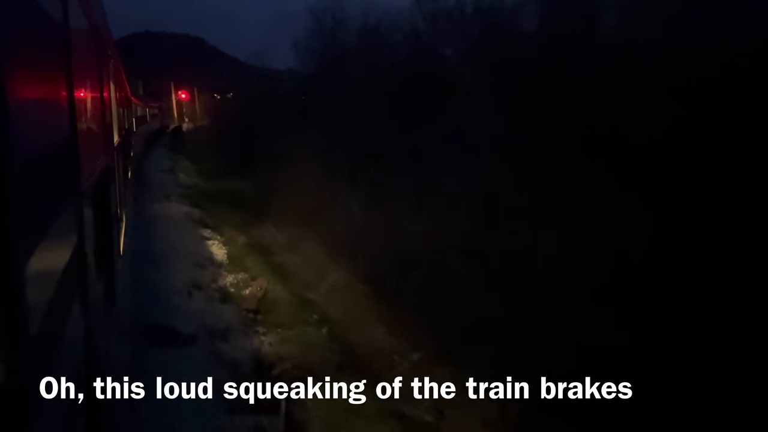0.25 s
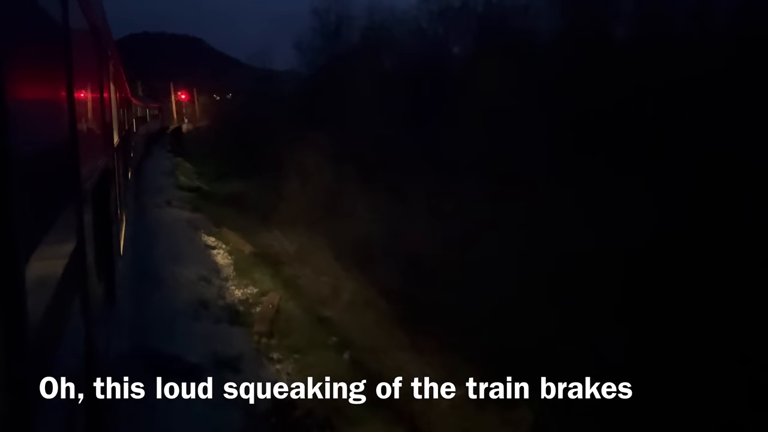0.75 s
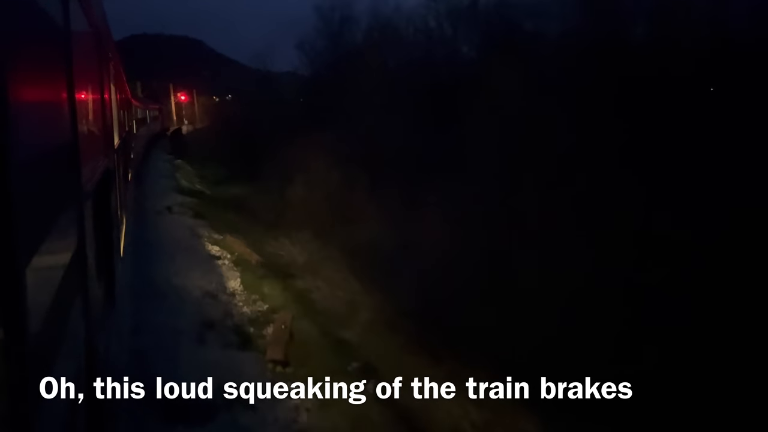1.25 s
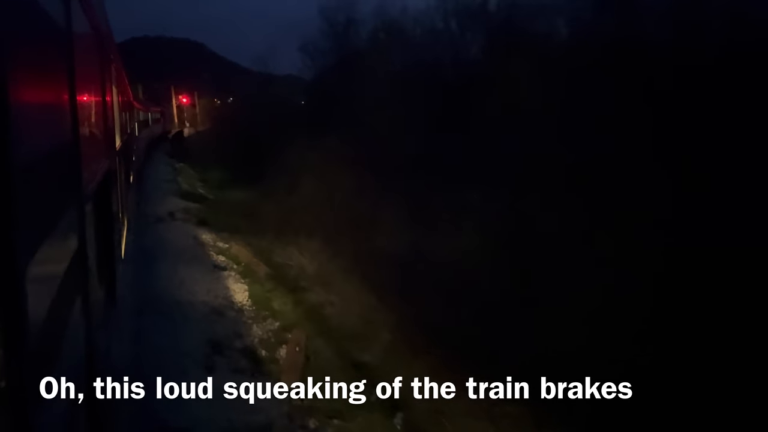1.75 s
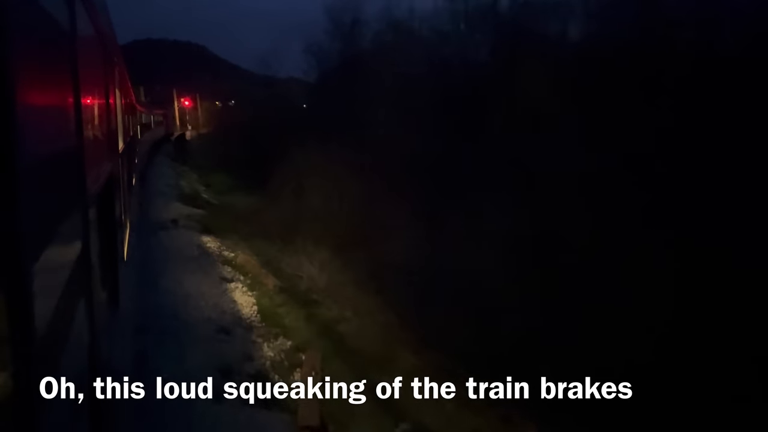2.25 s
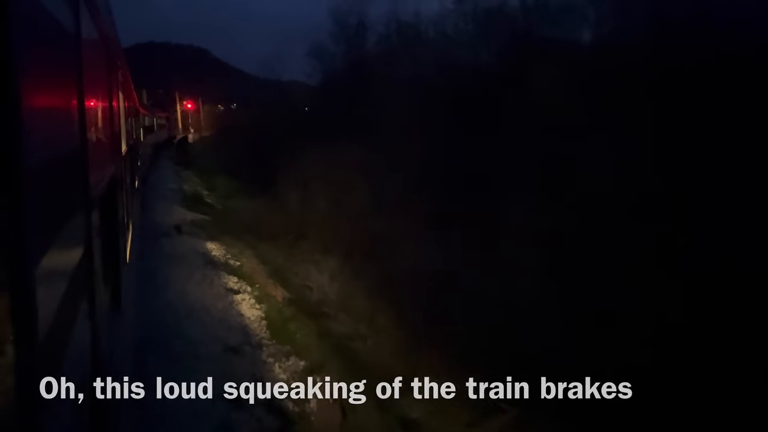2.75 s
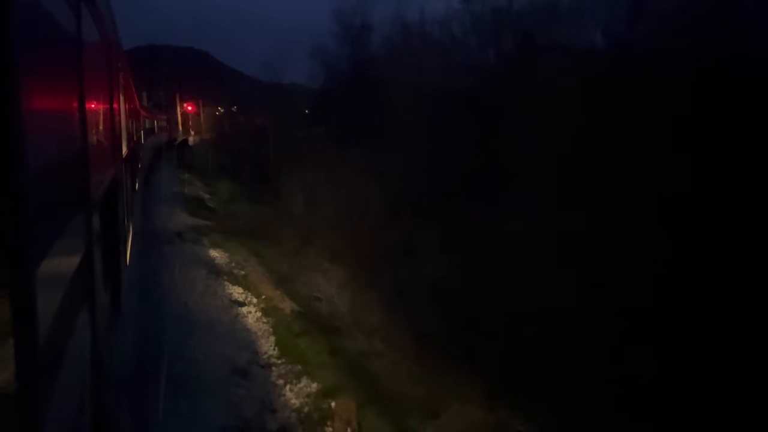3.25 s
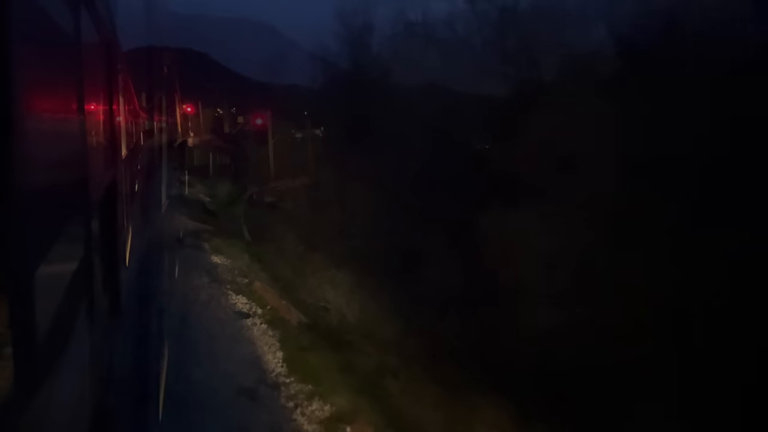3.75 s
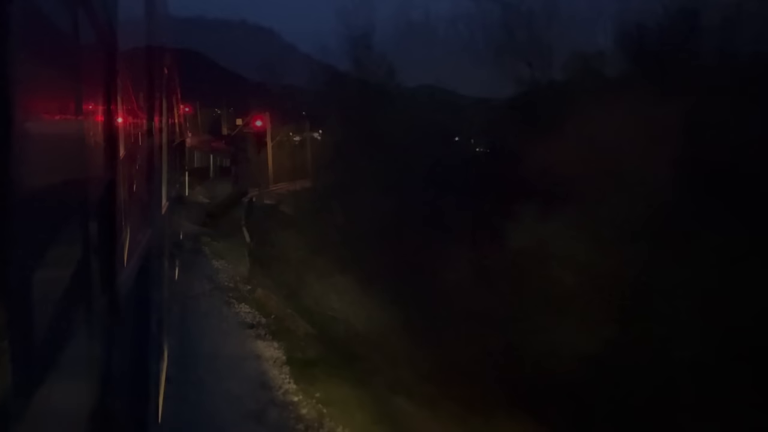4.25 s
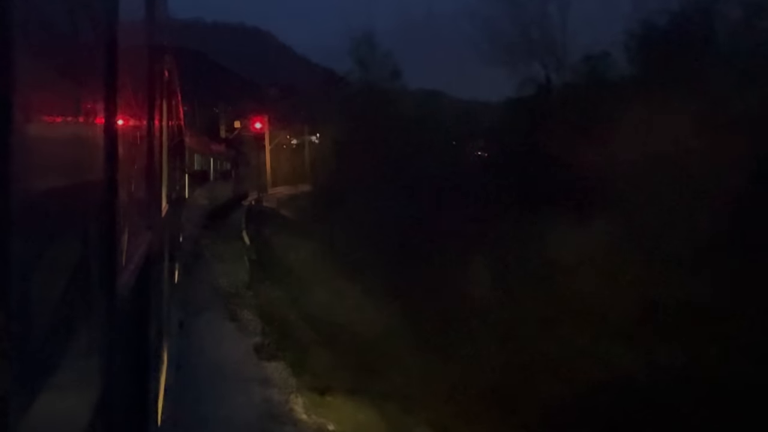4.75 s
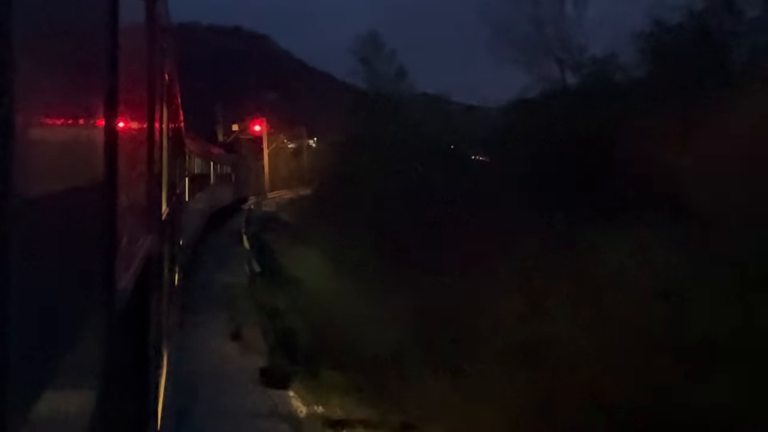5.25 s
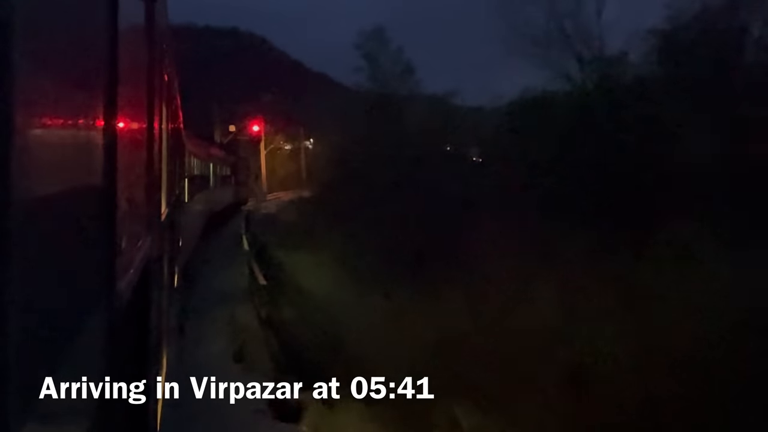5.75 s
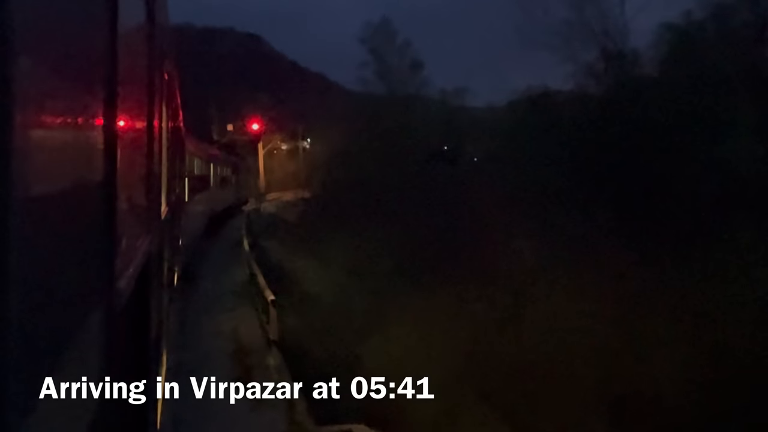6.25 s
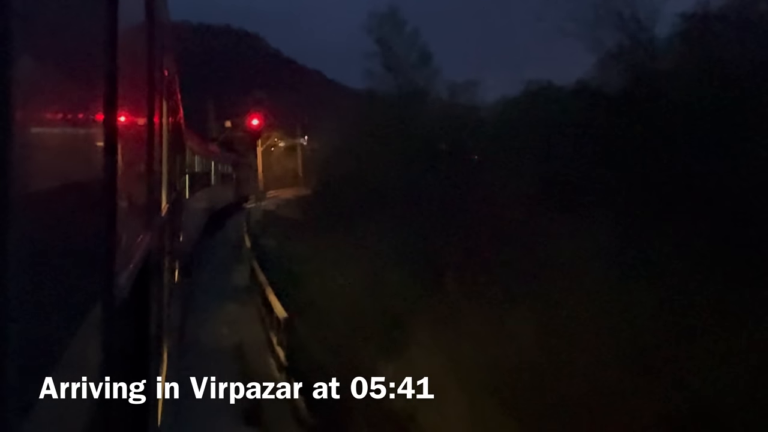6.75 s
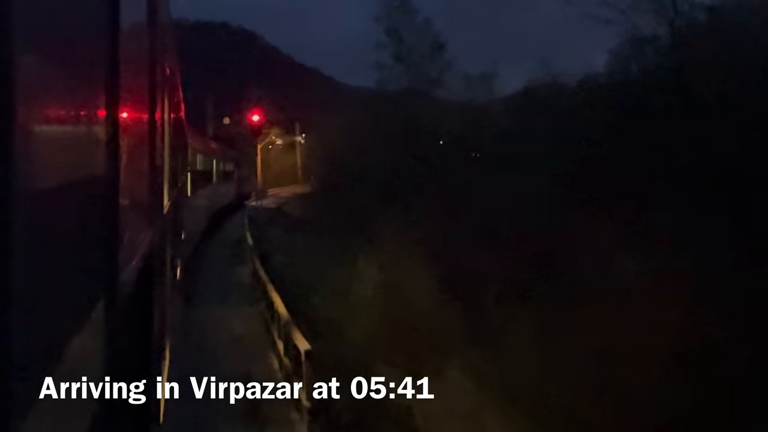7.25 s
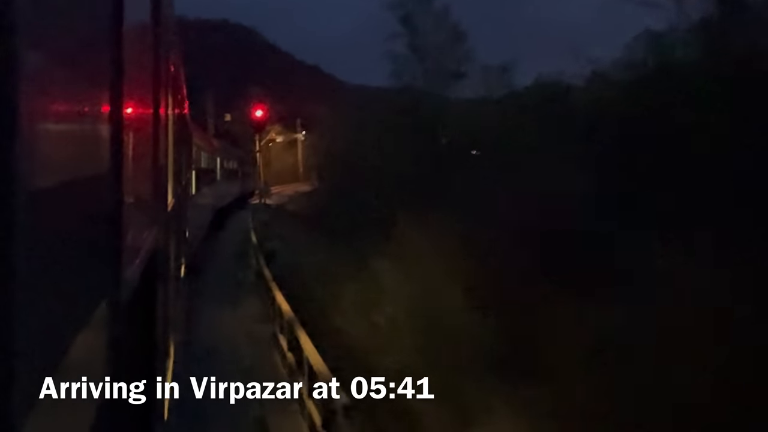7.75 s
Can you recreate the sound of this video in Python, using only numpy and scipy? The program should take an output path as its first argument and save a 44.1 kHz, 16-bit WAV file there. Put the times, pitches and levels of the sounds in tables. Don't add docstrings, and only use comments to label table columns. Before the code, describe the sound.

Very high brake screeching dominates at first, its close pitches shimmering unevenly, with distant coach rumble and soft thumps beneath. Midway it thins out and disappears. Then wind shoves bluntly at the exposed microphone outside the train window, over a growing nearby rail roar, repeated bright flange scrapes and a few metallic knocks. No voices.

```python
import sys
import numpy as np
from scipy import signal
from scipy.io import wavfile
from scipy.ndimage import uniform_filter1d

SR = 44100
rng = np.random.default_rng(int(sys.argv[2]) if len(sys.argv) > 2 else 0)


def unload_audio(sound):
    columns = np.transpose(np.atleast_2d(sound))
    steps = np.round(np.clip(columns, -1, 1) * 32767)
    wavfile.write(sys.argv[1], SR, steps.astype(np.int16))


def amplitude_ratio(level_db):
    exponent = np.asarray(level_db, float) / 20
    return 10 ** exponent


N = 352359


def evened(x):
    return x / np.sqrt(np.mean(abs(x) ** 2) + 1e-20)


def columns(rows, at):
    first, *rest = np.transpose(rows)
    return [np.interp(at, first, column) for column in rest]


def drift(shape, *spans):
    x = rng.standard_normal(shape)
    for axis, span in enumerate(spans):
        x = uniform_filter1d(x, span, axis)
        x = uniform_filter1d(x, span, axis)
    return evened(x)


def joined(*levels_db):
    return 10 * np.log10(sum(amplitude_ratio(2 * np.maximum(db, -200)) for db in levels_db))


def swell(t, start, hold, db, rise_db_per_s, fall_db_per_s):
    early, late = np.maximum(start - t, 0), np.maximum(t - start - hold, 0)
    return db - rise_db_per_s * early - fall_db_per_s * late


def noise(colour, rings, ports, levels, bands, patchy_db, flicker_db, alike=1, size=1024):
    hop = size // 4
    t, hz = np.arange(N // hop + 2) * hop / SR, np.fft.rfftfreq(size, 1 / SR)

    colour_hz, colour_db = np.transpose(colour)
    db = np.interp(np.log(hz + 1), np.log(colour_hz + 1), colour_db)
    db = db + sum(top_db * np.exp(-(2 * (hz - at) / width) ** 4) for at, width, top_db in rings)

    low_db, high_db = columns(levels, t)
    power = amplitude_ratio(2 * db) / 6
    own_db = [10 * np.log10(power[(hz > lo) & (hz < hi)].sum()) for lo, hi in bands]
    low_top, high_bottom = bands[0][1], bands[1][0]
    blend = np.clip((hz - low_top) / (high_bottom - low_top + 60) + .2, 0, 1)
    db = db + np.outer(low_db - own_db[0], 1 - blend) + np.outer(high_db - own_db[1], blend)
    db += patchy_db * drift(db.shape, 6, 10)
    db += flicker_db * drift((len(t), 1), 3)

    same, lead, side_db = columns(ports, hz)
    same = np.clip(np.outer(alike * np.ones(len(t)), same), 0, 1)
    right = amplitude_ratio(-side_db)
    a, b, c, d = np.moveaxis(rng.standard_normal(db.shape + (4,)), 2, 0)
    shared, own = a + 1j * b, c + 1j * d
    z = np.array([shared, right * (same * shared * np.exp(-1j * lead) + np.sqrt(1 - same ** 2) * own)])
    z *= amplitude_ratio(db) / np.sqrt(1 + right ** 2 + 2 * right * same * np.cos(lead))
    return signal.istft(z.transpose(0, 2, 1), nperseg=size, noverlap=size - hop)[1][:, :N]


# frequency in Hz, level in dB per Hz.
FAR_COLOUR = [(130, -19), (260, -21), (390, -9), (620, -0.5), (920, -6.5), (1150, -9), (1850, -7.5),
              (2200, -16), (3350, -15.5), (5050, -17), (6250, -16.5), (7300, -16.5), (8100, -21),
              (10500, -26), (11500, -45)]
# frequency in Hz, width in Hz, boost in dB.
FAR_RINGS = [(461, 69, 9.5), (530, 37, 5), (832, 27, 8.5), (1059, 28, 4)]
# frequency in Hz, likeness 0-1, left lead in rad, left-right in dB.
FAR_PORTS = [(150, .5, 0, 0), (400, .85, .3, -5), (900, .7, 0, -3), (1800, .6, -.3, 2),
             (2300, .35, -2.9, -3), (3000, .3, -5, -2), (4000, .4, -7.6, -3), (6200, .15, -6.8, -6),
             (7200, .3, -7.2, -2)]
FAR_BODY_DB, FAR_HISS_DB, FAR_SAG_DB_PER_S = -54, -63.5, 1.8
FAR_FADE_S, FAR_FADE_DB_PER_S = 3.5, 10


def far_rolling():
    levels = [(s, FAR_BODY_DB, FAR_HISS_DB - FAR_SAG_DB_PER_S * s) for s in (0, N / SR)]
    bed = noise(FAR_COLOUR, FAR_RINGS, FAR_PORTS, levels, [(400, 1480), (2050, 4000)],
                patchy_db=1.26, flicker_db=.45, size=2048)
    return bed * amplitude_ratio(-FAR_FADE_DB_PER_S * np.maximum(np.arange(N) / SR - FAR_FADE_S, 0))


# time in seconds, flutter level in dB.
GUST = [(0.0, -53.5), (3.14, -59), (3.96, -37.5), (4.05, -40), (4.52, -26), (4.83, -32.5), (5.34, -21.5),
        (5.36, -29), (5.58, -17), (5.63, -24.5), (5.67, -15), (5.7, -22), (6.03, -24), (6.05, -17),
        (6.54, -21.5), (6.59, -16.5), (7.97, -23), (7.99, -24)]
# centre in seconds, level in dB, length in seconds.
SHOVES = [(.95, -49, .25), (1.12, -49.5, 0.11), (1.52, -52, .15), (2.07, -50, 0.16), (2.55, -51, .12),
          (2.78, -53, .12), (3.24, -47.5, 0.21), (4.04, -33, 0.11), (4.4, -34, 0.088), (4.872, -33.5, 0.23),
          (5.3, -25, .12), (5.5, -18, 0.14), (6.15, -21, 0.26), (6.597, -16.5, 0.16), (6.78, -16.5, 0.13),
          (7.1, -15, 0.11), (7.328, -14, 0.13), (7.75, -23.5, 0.31)]
THUMP_DB = -3


def wind_levels():
    t = np.arange(0, N / SR, .01)
    flutter_db, = columns(GUST, t)
    shoves = [db - 12 * (2 * (t - s) / length) ** 2 / 2 for s, db, length in SHOVES]
    return np.transpose([t, joined(flutter_db + THUMP_DB, *shoves), flutter_db])


# frequency in Hz, level in dB per Hz.
WIND_COLOUR = [(10, -41), (22, -21), (34, -12.5), (46, 2.5), (71, 4), (101, -3.5), (202, -5.5),
               (303, -10.5), (404, -15), (505, -21.5), (655, -35.5), (950, -54), (2000, -94)]
# frequency in Hz, likeness 0-1, left lead in rad, left-right in dB.
WIND_PORTS = [(60, .94, 0, -.5), (130, .82, 0, -1.1), (290, .48, .3, -1.3), (600, .3, 1, -3)]
CALM_LIKENESS = 0.37


def wind():
    alike = np.interp(np.arange(N // 256 + 2) * 256 / SR, [3.3, 4.2], [CALM_LIKENESS, 1])
    air = noise(WIND_COLOUR, [], WIND_PORTS, wind_levels(), [(50, 87), (110, 340)],
                patchy_db=2.0, flicker_db=0.73, alike=alike)
    air = air * amplitude_ratio(3.23 * drift(N, 200) - 1.2)
    low_cut = signal.butter(3, 42, "high", fs=SR, output="sos")
    return signal.sosfilt(low_cut, air)


# start in seconds, level in dB, centre in Hz, width in Hz, 60 dB decay in seconds.
KNOCKS = [(.47, -57, 4400, 500, .2), (.85, -57, 4500, 600, .15), (1.1, -46, 110, 130, .12),
          (1.39, -54, 5400, 5200, 0.33), (1.42, -50.5, 2232, 60, 0.22), (1.54, -55, 4040, 60, 0.23),
          (1.86, -42, 90, 100, 0.13), (2.07, -45, 80, 80, .12), (2.53, -43, 90, 100, .12),
          (3.19, -42, 70, 70, .2), (4.02, -39, 7500, 9000, .11), (5.4, -35, 1992, 50, .2),
          (6.3, -32, 3100, 5200, .14)]


def knocks():
    out, t = np.zeros((2, N)), np.arange(SR // 3) / SR
    for s, db, hz, width, t60 in KNOCKS:
        edges = np.clip([hz - width / 2, hz + width / 2], 30, SR / 2 - 100)
        resonance = signal.butter(2, edges, "band", fs=SR, output="sos")
        burst = signal.sosfilt(resonance, rng.standard_normal((2, len(t))))
        burst = evened(burst + 1.2 * burst[0])
        burst *= amplitude_ratio(db - 60 * t / t60) * np.minimum(t / .002, 1)
        start = round(s * SR)
        out[:, start:start + len(t)] += burst
    return out


# time in seconds, body level in dB.
NEAR = [(3.3, -54), (3.49, -49), (4.4, -38.5), (5.22, -34), (7.34, -29.5), (7.35, -24.5), (7.36, -31),
        (7.98, -31.5), (7.99, -29)]
# time in seconds, level in dB.
SCRAPES = [(4.0209, -36), (4.43, -35.5), (4.7004, -33.5), (4.9244, -31), (5.0436, -27), (5.4222, -29.5),
           (5.6293, -27.5), (5.7889, -26.5), (5.9226, -29), (6.1132, -23.5), (6.3072, -21.5),
           (6.5192, -20.5), (6.7233, -25.5), (6.841, -20), (7.1408, -30), (7.2581, -23), (7.4142, -26),
           (7.6262, -21), (7.7574, -25), (7.9455, -23)]
SCRAPE_DB, SCRAPE_RISE_DB_PER_S, SCRAPE_FALL_DB_PER_S = -10.5, 300, 38
HISS_DB, HISS_SLOPE, FULL_DB = -38.5, 1.12, -30.5


def near_levels():
    t = np.arange(0, N / SR, .005)
    body_db, = columns(NEAR, t)
    hiss_db = HISS_DB + HISS_SLOPE * (body_db - FULL_DB)
    scrapes = [swell(t, s, 0, db + SCRAPE_DB, SCRAPE_RISE_DB_PER_S, SCRAPE_FALL_DB_PER_S)
               for s, db in SCRAPES]
    return np.transpose([t, body_db, joined(hiss_db, *scrapes)])


# frequency in Hz, level in dB per Hz.
NEAR_COLOUR = [(300, -18.5), (510, -4.5), (720, -7.5), (1120, -12.5), (1920, -13.5), (2520, -12),
               (3320, -21.5), (4020, -17), (6220, -14.5), (7220, -23), (8120, -26.5), (9820, -16.5),
               (11520, -22), (12520, -26.5), (14420, -30), (15250, -42.5), (15700, -70)]
# frequency in Hz, width in Hz, boost in dB
NEAR_RINGS = [(827, 63, 5.5), (1620, 94, 3.5), (2240, 89, 8), (2820, 74, 4.5), (4140, 200, 2.5),
              (4902, 280, 3), (5730, 260, 1.5), (12040, 250, 3), (13330, 820, -40)]
# frequency in Hz, likeness 0-1, left lead in rad, left-right in dB.
NEAR_PORTS = [(400, .4, .9, -2), (900, .3, .8, -6), (1100, .3, -.8, -5), (1500, .65, -.3, 0),
              (1900, .999, 0, 0), (3900, .999, 0, 0), (4400, .87, -.3, 0), (5700, .85, -1, 0),
              (6500, .88, -.2, 0), (7300, .65, -1, 0), (7700, .8, -2.7, 0), (8800, .87, -2.6, 0),
              (10400, .9, 0, 0), (11700, .9, 0, 0), (12700, .9, 2.8, 0), (14000, .3, 4.5, 0),
              (14600, .85, 6.2, 0)]


def near_rolling():
    roar = noise(NEAR_COLOUR, NEAR_RINGS, NEAR_PORTS, near_levels(), [(430, 1920), (3600, 9400)],
                 patchy_db=1.22, flicker_db=0.86)
    return roar * np.clip((np.arange(N) / SR - 3.25) / .4, 0, 1)


# time in seconds, level in dB.
GRIP = [(0.0, -35), (0.01, -32.5), (0.84, -37), (1.27, -31.5), (1.96, -30.5), (2.01, -36), (2.08, -24.5),
        (2.11, -38), (2.17, -30), (2.22, -36.5), (2.66, -30.5), (3.25, -34), (3.46, -29.5), (5.19, -41),
        (5.21, -48), (5.5, -51)]
# start in seconds, hold in seconds, level in dB.
BITES = [
    [(0, 0.23, -42.5), (.5, 0.11, -42.5), (.75, .1, -47), (1.3, 0.23, -49.5), (1.85, 0.26, -48.5),
     (2.3, 0.13, -46.5), (3.6, .1, -55), (3.85, .4, -55.5), (4.5, .05, -62)],
    [(.45, 0.045, -62), (.7, 0.42, -66), (1.4, .05, -54.5), (1.58, .05, -58), (2.0, .05, -62),
     (2.2, 0.29, -67)],
    [(.12, 0.083, -50), (.45, 0.11, -59.5), (.75, .05, -67), (1.42, .03, -70), (2.2, .1, -74)],
]
BITE_DB_PER_S, LET_GO_DB_PER_S = 66, 39


def grips(t):
    bitten = [joined(*(swell(t, *bite, BITE_DB_PER_S, LET_GO_DB_PER_S) for bite in bites))
              for bites in BITES]
    return columns(GRIP, t) + bitten


# time in seconds, spread factor.
SLOWING = [(0, 1.3), (1.5, 1.0505), (3, .9), (4.5, 0.552), (5.2, .4)]
# family, frequency in Hz, spread in Hz, level in dB, gone after seconds.
WHEEL = [(0, 9686, 45.99, 2.5, 5.45), (1, 8620, 43.9, 4.5, 4.8), (2, 4360, 34, 3.5, 2.58),
         (3, 6636, 36.2, 3.5, 2.2), (0, 10232, 45.3, -28.5, 3.2), (0, 9170, 44.8, -36, 4.1),
         (1, 10800, 54.6, -17, 3), (1, 7570, 40, -23.5, 2.6), (1, 13800, 60, -14.5, 1.2),
         (0, 14800, 150, -32.5, 1.86), (1, 5372, 70, -26, 1.2)]
# left lead in rad, angle between wheels in rad, left-right in dB.
WHEEL_PORTS = [(-1.5, .17, -.5), (-2.8, .45, -.5), (-.6, 1.2, -4), (-.5, 1, -4), (-.3, .55, 0),
               (-2.3, .55, 0), (0, .25, 0), (-2.8, 1, -2), (-2.3, .3, 0), (-.3, .55, 0), (-.6, 1.2, -4)]


def squeal(count=5, step=32):
    t, slow = np.arange(N) / SR, np.arange(N // step + 2) * step / SR
    grip_db, (spread,), out = grips(slow), columns(SLOWING, slow), np.zeros((2, N))
    for (family, hz, spread_hz, db, gone), (lead, angle, side_db) in zip(WHEEL, WHEEL_PORTS):
        wander = drift((len(slow), count), 22) + .8 * drift((len(slow), count), 7)
        detune_hz = spread_hz * spread[:, None] * .5 * wander
        turns = np.cumsum(detune_hz, 0) * step / SR + rng.random(count)
        wheels = np.exp(2j * np.pi * turns)
        wheels *= amplitude_ratio(3.35 * drift(wheels.shape, 14))

        leads = lead + angle * evened(rng.standard_normal(count))
        ports = np.exp(.5j * np.outer(leads, [1, -1]))
        both = wheels @ ports * amplitude_ratio(np.array([side_db, -side_db]) / 2)
        level_db = grip_db[round(family)] + db - 80 * np.maximum(slow - gone, 0)
        both *= amplitude_ratio(level_db)[:, None] / np.sqrt(np.mean(abs(both.mean(1)) ** 2) / 2)

        carrier = np.exp(2j * np.pi * hz * t)
        for port, p in enumerate(both.T):
            envelope = np.interp(t, slow, p.real) + 1j * np.interp(t, slow, p.imag)
            out[port] += (carrier * envelope).real
    return out


def scene():
    return far_rolling() + wind() + knocks() + near_rolling() + squeal()


# frequency in Hz, then dB per Hz while quiet, as the roar rises, in full roar.
KEPT = [(7400, -130, -130, -130), (7750, -106, -89, -87), (9000, -103, -87, -88), (10300, -103, -78, -92),
        (10470, -93.5, -81.5, -92), (12300, -89, -83.5, -95), (13000, -94, -88, -92),
        (13800, -101, -92.5, -91.5), (14200, -96, -92.5, -89), (15300, -98, -94, -96)]
ROAR_S = 4.27, 4.79


def drop_weak_bands(x, size=2048, count=16):
    hz, t, z = signal.stft(x, SR, nperseg=size, noverlap=size // 2, window="cosine")
    power = np.add.reduceat(abs(z.mean(0)) ** 2, np.arange(0, len(hz), count)) / count
    density_db = 10 * np.log10(power * 16 * size / (np.pi ** 2 * SR) + 1e-30)
    floor_db = np.transpose(columns(KEPT, hz[::count] + count * hz[1] / 2))
    floor_db = floor_db[:, np.searchsorted(ROAR_S, t)]
    kept = density_db + 1.5 * rng.standard_normal(power.shape) > floor_db
    z = z * np.repeat(kept, count, 0)[:len(hz)]
    return signal.istft(z, SR, nperseg=size, noverlap=size // 2, window="cosine")[1][:, :N]


def top_cut(x):
    return signal.sosfilt(signal.butter(12, 16340, fs=SR, output="sos"), x)


def record(dry):
    overloaded = 1.25 * np.tanh(dry / 1.355)
    return top_cut(drop_weak_bands(overloaded))


dry = scene()
out = record(dry)
unload_audio(out)
```